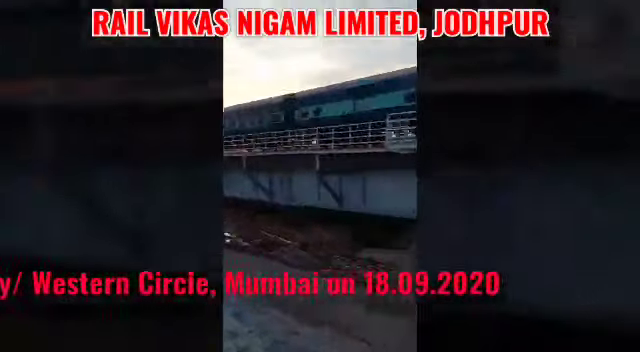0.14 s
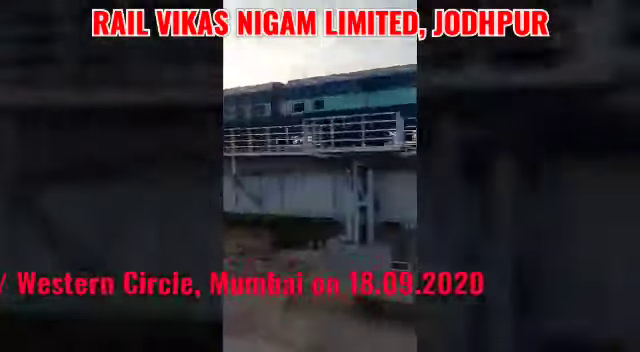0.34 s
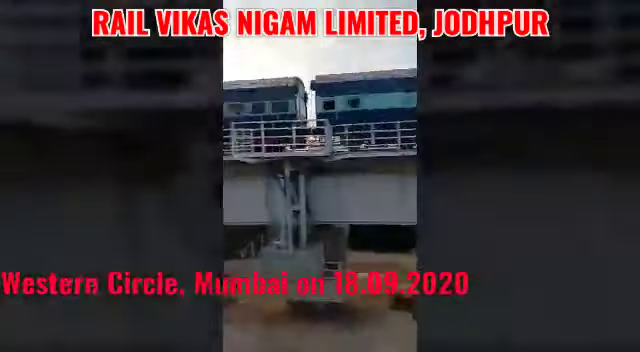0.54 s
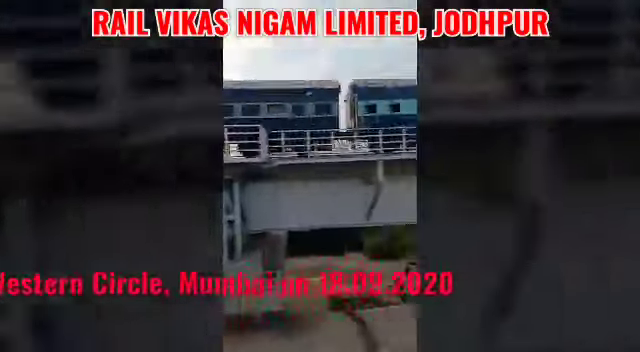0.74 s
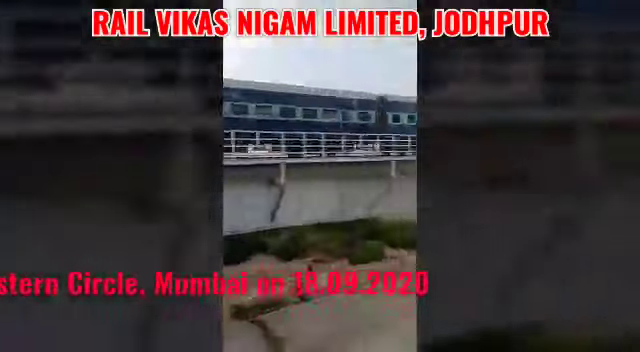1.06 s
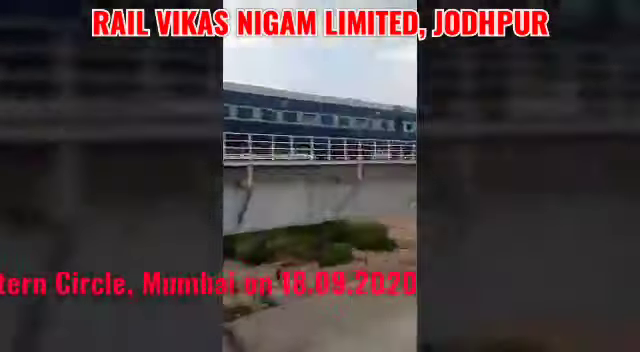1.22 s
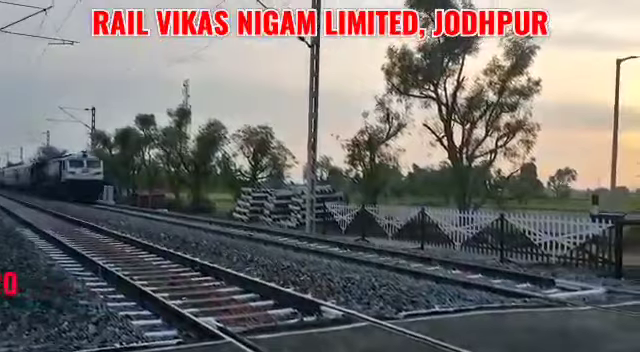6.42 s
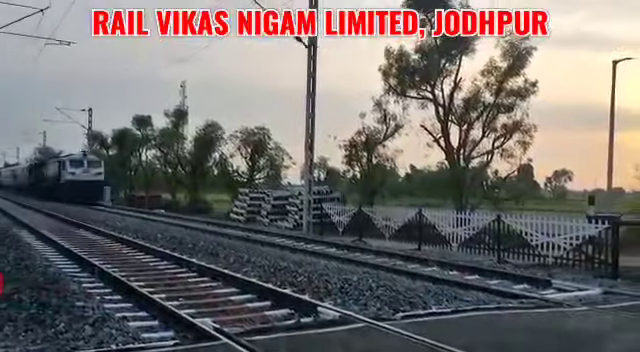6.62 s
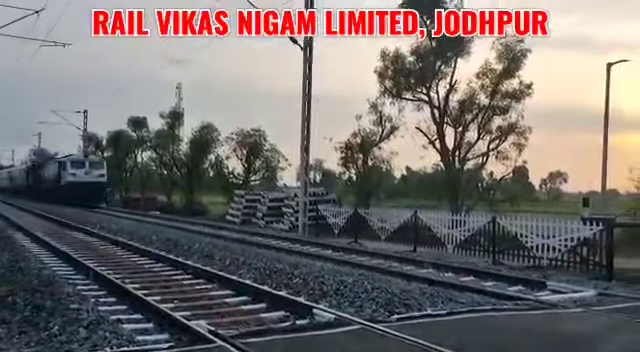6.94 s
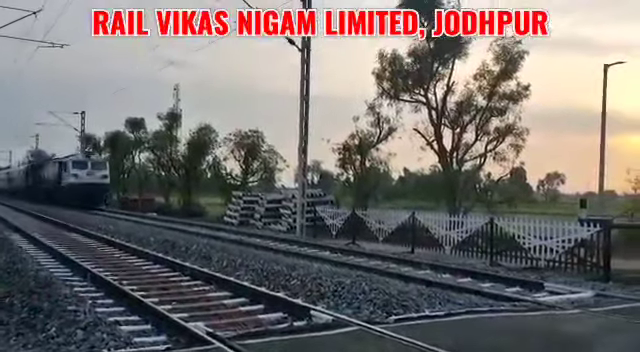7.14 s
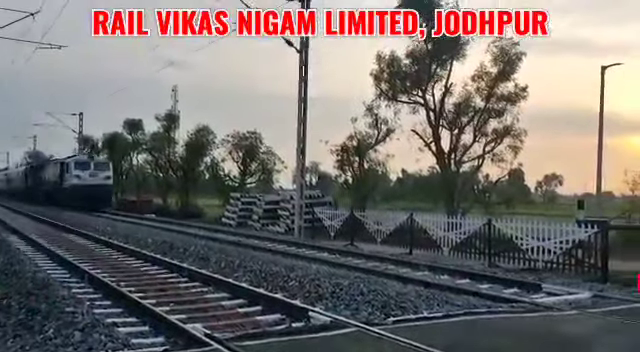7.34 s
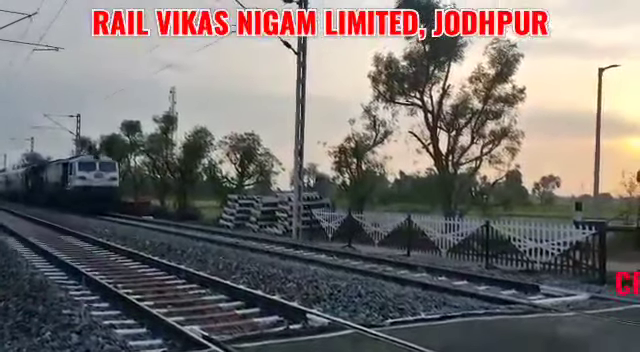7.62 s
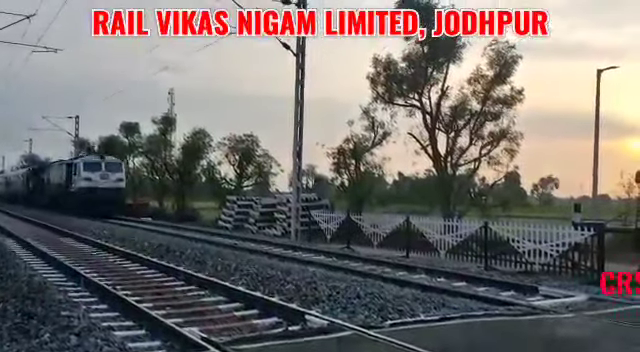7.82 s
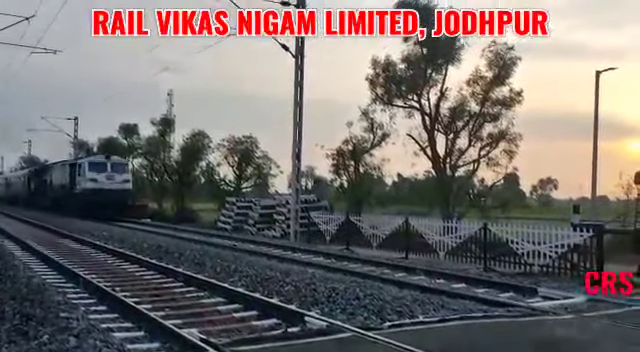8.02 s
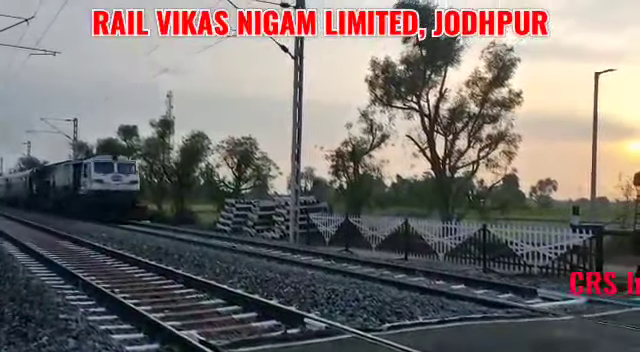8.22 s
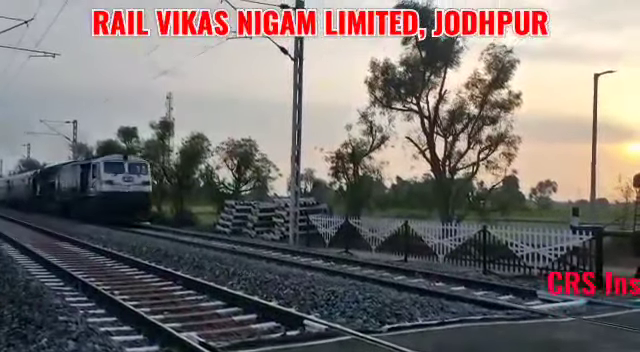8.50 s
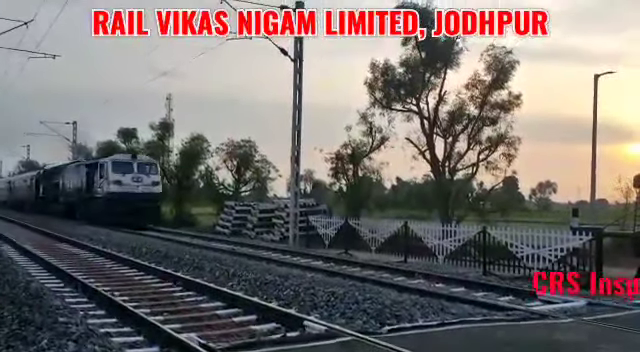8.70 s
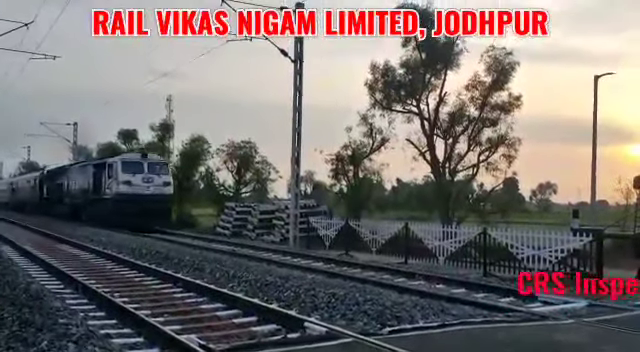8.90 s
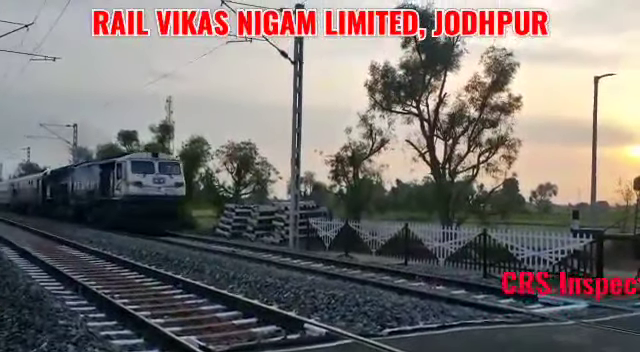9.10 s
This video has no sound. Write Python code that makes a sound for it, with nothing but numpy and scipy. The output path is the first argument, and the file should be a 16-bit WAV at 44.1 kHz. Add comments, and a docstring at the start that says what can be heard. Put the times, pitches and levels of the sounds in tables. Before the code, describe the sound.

Outdoors beside a railway, coaches roll past close by with a rough mid-range roar, ringing rails, low thuds and tiny wheel squeaks. After about three seconds they fade to silence. A throbbing diesel drone fades in, then a piercing two-note air horn bursts out and holds steadily to the end, raspy and bright, leaning left as the locomotive approaches.

```python
"""Coaches, then a diesel with its horn

Beside a railway line, coaches roll by as filtered noise with ringing tones, then fade to silence.
A diesel locomotive fades in, throbbing, and holds a two-note air horn built from overtones as it approaches.
The horn's bounce off the ground sweeps notches down through its overtones."""
import sys
import numpy as np
from scipy import signal
from scipy.fft import rfft, irfft, next_fast_len
from scipy.io import wavfile
from scipy.ndimage import uniform_filter1d, map_coordinates

SR = 44100
rng = np.random.default_rng(int(sys.argv[2]) if len(sys.argv) > 2 else 0)


def materialize(psi):
    """Save the field psi as 16-bit PCM at rate SR to the path in sys.argv[1].

    A 1-D psi becomes a single channel; in a 2-D psi each row is a channel.
    """
    bounded = np.clip(np.atleast_2d(psi).T, -1, 1)
    quanta = np.round(bounded * 32767).astype(np.int16)
    wavfile.write(sys.argv[1], SR, quanta)


N = 408807
TIME = np.arange(N) / SR
TOP_HZ = 14650  # upper limit of the whole sound

# overtones of each horn: (multiple of its pitch, far level [dB], near level [dB], left over right [dB])
HIGH_HORN = [(1, -35.5, -36, 1), (2, -18.5, -19, 4), (3, -31.5, -38.5, 3), (4, -38, -32.5, -5),
             (5, -29, -33, 4), (6, -34, -31, 1.5), (7, -30, -29, 2.5), (8, -36.5, -37, 5),
             (9, -36, -41.5, 5), (10, -35.5, -38, 8.5), (11, -40.5, -36, 13), (12, -36, -36.5, 12.5),
             (13, -37.5, -32, 15.5), (14, -36, -35, 14), (15, -37.5, -36, 9.5), (16, -40, -41, 10),
             (17, -44.5, -39, 10.5), (18, -47, -50.5, 6.5)]
LOW_HORN = [(1, -48, -41, 1), (2, -28, -28, 2), (3, -32.5, -26.5, 1.5), (4, -30, -29.5, 3.5),
            (5, -35, -33, 4), (6, -38.5, -37.5, 10), (7, -40, -43, 6), (8, -39, -35, -4),
            (9, -39.5, -35.5, 11.5), (10, -41.3, -39, 6), (11, -36, -31.5, 10), (12, -43.5, -52, 3),
            (13, -39.5, -42, 7), (14, -42, -38.5, 8.5), (15, -44.5, -49.5, 3), (16, -43.5, -41, 12),
            (17, -41, -40, 12), (18, -42, -40, 7.5), (19, -38.5, -36.5, 6.5), (20, -45, -47.5, 9),
            (21, -48, -47.5, 9.5), (22, -44, -42.5, 10.5), (23, -48, -48, 3), (24, -55, -47.5, 5.5),
            (26, -59, -54, 5)]
# pop at the horn's start: (frequency [Hz], level [dB], decay [s])
POP = [(945, -11.5, .005), (468, -26.5, .006)]
# strongest sum and difference tones: (multiple of high horn, multiple of low horn, level [dB])
SUM_TONES = [(1, 2, -45), (1, 4, -52), (6, 2, -47), (5, 5, -47), (9, -10, -44), (-1, 4, -49), (-2, 7, -49),
             (5, 2, -50)]
# treble weighting of the dense sum tones: (frequency [Hz], gain [dB])
DENSE_TONES = [(1500, -8), (3500, -2.5), (5000, -3.5)]
# colour of the rasp: (frequency [Hz], relative level [dB])
RASP = [(150, -22), (240, -24.5), (450, -23.5), (530, -26), (620, -14.5), (730, -31), (850, -11.5),
        (1150, -10.5), (1430, -14), (1700, -5), (2030, -17), (2200, -3.5), (2330, -11), (2800, -4),
        (4400, -5.5), (6000, -2), (7500, -4), (8600, -18), (10000, -21.5)]
# sideways lean of the rasp: (frequency [Hz], left over right [dB])
RASP_PAN = [(600, -24), (2000, -17), (3500, 1.5), (5000, 8.5), (7000, 7), (10000, 20)]
# the rasp grows fuller near by: (frequency [Hz], added level [dB])
RASP_NEAR = [(700, 3), (1300, 3.5), (2000, 6.5), (3000, 3.5), (4000, -.5), (5500, 0), (7000, 0)]
# colour of the horn's top octave: (frequency [Hz], relative level [dB])
SIZZLE = [(7000, -34.5), (8200, -2.5), (9500, -19), (10400, -9), (11200, -2.5), (13000, 1), (14500, -7)]
# ground bounce while far: (frequency [Hz], strength [share of direct sound])
GROUND = [(900, .03), (1300, .55), (2200, .62), (3000, .68), (5300, .6), (6500, .36), (8000, .2),
          (14000, .15)]
# the chord starts hollow and biting: (centre [Hz], width [octaves], first gain [dB], lasts [s])
START_COLOUR = [(1370, 0.28, -4, 1.6), (2350, 0.18, -1.5, 0.46), (4460, 0.084, 6, 0.7),
                (5850, 0.06, 3, 1.2)]
# noise around each overtone: (frequency [Hz], level against the overtone [dB])
NOISE_BAND = [(900, -29), (2000, -23), (3000, -20), (6000, -16)]
# lead of the left channel over the right: (frequency [Hz], phase [radians])
LEFT_LEAD = [(150, 0.48), (434, 0.38), (870, 0.69), (1300, 1.36), (2100, 1.15), (3000, 0.71), (5000, 0.099)]
# colour of the exhaust rush: (frequency [Hz], relative level [dB])
EXHAUST = [(25, -15), (60, -10), (200, -16), (420, -2), (530, -8), (620, 6), (730, -9), (830, -3.5),
           (1200, -2), (1900, -10), (2700, -12.5), (3600, -6.5), (5900, 1), (9400, -25.5), (11000, -10.5),
           (13300, -32), (14200, -61)]
# faint whistles of the locomotive's blowers: (frequency [Hz], peak level [dB])
BLOWERS = [(600, -51), (2250, -61), (3500, -48)]
# colour of the rolling noise: (frequency [Hz], relative level [dB])
ROLL = [(21, -60.5), (35, -42.5), (66, -9.5), (224, -5), (268, -4), (605, -10), (794, -6.5), (1040, -10),
        (1250, -7.5), (1500, -12.5), (2250, -14), (3400, -16.5), (4400, -23), (6200, -30), (6810, -33),
        (7800, -50), (10100, -78), (17200, -120)]
# swelling of the rolling roar; its average is trimmed by body_db: (time [s], level [dB])
ROAR = [(0, -22.3), (.4, -21), (.7, -24), (1.3, -22), (1.65, -23.5), (2.15, -22), (2.35, -23.5),
        (2.7, -22.7), (2.95, -24)]
# heavy bogies thud by: (time [s], width [s], rumble rise [dB])
SURGES = [(2.15, 0.15, 3.5), (2.93, 0.062, 4), (3.2, 0.26, 8.5)]
# ringing of wheels and bogies: (frequency [Hz], width [Hz], level before swelling [dB])
RINGS = [(853, 270, -30.5), (1170, 76, -40), (1937, 210, -39), (2660, 370, -32.5), (3134, 320, -39.5),
         (5330, 790, -40.5)]
# steady tones of the coaches: (frequency [Hz], average peak level [dB])
WHINE = [(394, -35), (558, -42), (791, -36), (1577, -47.5)]
# the rails' ring swells and strays; its level is trimmed by rail_db: (time [s], level [dB], pitch [Hz])
RAIL_RING = [(0, -24.5, 1305), (.25, -24.5, 1255), (.6, -26.5, 1280), (.85, -23.5, 1235),
             (1.05, -22.5, 1262), (1.4, -21.5, 1245), (1.7, -23, 1265), (1.9, -27, 1258), (2.45, -23, 1265),
             (2.95, -27, 1262)]
# wheel flanges sing: (time [s], frequency [Hz], level [dB])
SQUEAKS = [(.34, 2670, -28.5), (.735, 2605, -20.5), (.86, 2530, -27), (1.41, 2600, -31)]

# times and lengths in seconds
FADE_OUT_S, FADE_OUT_LENGTH_S, FADE_OUT_POWER = 2.967, 0.57, 1.1  # the coaches fade to silence
FADE_IN_S, FADE_IN_LENGTH_S, FADE_IN_POWER = 3.681, 0.21, 1.37  # the locomotive fades in
HORN_S = 4.151  # the valve opens
LOW_SPEAKS_S, LOW_JOINS_S, JOIN_LENGTH_S = 4.175, 4.225, .055  # the low horn speaks, then opens further
CATCH_S, CATCH_LENGTH_S, CATCH_DB = 4.278, .022, 2.5  # the rasp flares as the low horn catches
NEAR_S, NEAR_LENGTH_S = 7.01, 1.0  # the horn passes from far to near
# the engine tone and the horns' fundamentals thin out at the end
THIN_S, THIN_LENGTH_S, THIN_DB = 8.56, .5, -6

HIGH_HZ, LOW_HZ = 433.75, 307.1  # pitches before the slow Doppler rise
DOPPLER_PER_S = .00078  # both pitches creep up by this share a second as the train gathers speed
HIGH_SHARP, HIGH_SETTLE_S, LOW_SHARP = .053, .029, .046  # each horn starts sharp by this share of its pitch
# notch spacing [Hz per second left until arrival], arrival [s], phase shift at the ground [cycles]
BOUNCE_RATE, ARRIVAL_S, GROUND_TURN = 232, 12.3, .19
BOUNCE_FADES_S, BOUNCE_FADE_LENGTH_S = 6.6, 1.1
BOUNCE_LOSS = .74  # share of the bounce's strength lost near by
SHIMMER_DB, TWINKLE_DB = .65, .55  # slow and quick drift in the moving air, at 2500 Hz


def horns(high_db=0, low_db=0, rasp_db=-29.0, sizzle_db=-40.5, sizzle_near_db=4.0, solo_rasp=0.64):
    """Two horns a tritone apart: a pop marks the start, the high one sounds and the low one joins; both settle
    from sharp."""
    blown = ramp(HORN_S, 0.0087)
    bright = ramp(HORN_S + 0.0026, 0.0067)
    joined = ramp(LOW_JOINS_S, JOIN_LENGTH_S)
    settling = np.exp(-np.maximum(TIME - HORN_S, 0) / HIGH_SETTLE_S)
    high_phase = diaphragm(HIGH_HZ * (1 + HIGH_SHARP * settling))
    low_phase = diaphragm(LOW_HZ * (1 + LOW_SHARP * (1 - joined)))

    high = amp(high_db) * blown * horn(high_phase, HIGH_HORN, bright)
    low_opening = 0.2 + 0.74 * joined
    low = amp(low_db) * ramp(LOW_SPEAKS_S, 0.034) * horn(low_phase, LOW_HORN, low_opening, bass_sway_db=1.8)
    rasp_level = amp(rasp_db + CATCH_DB * swell(CATCH_S, CATCH_LENGTH_S))
    rasp_level = rasp_level * (solo_rasp * bright + (1 - solo_rasp) * joined)
    edge = rasp_level * approaching(rasp(high_phase, low_phase))
    sheen = bright * amp(sizzle_db + sizzle_near_db * nearness()) * sizzle(high_phase, low_phase)
    sums = joined * sum(amp(db) * sine(j * high_phase + k * low_phase) for j, k, db in SUM_TONES)

    chord = open_air(high + low + sums + edge + sheen)
    return chord + noise_around(chord) + blown * pop()


def diaphragm(pitch_hz, waver=0.00027):
    """Phase of a horn's diaphragm as heard: it wavers a little, and the Doppler shift slowly grows."""
    doppler = 1 + DOPPLER_PER_S * (TIME - HORN_S)
    return 2 * np.pi * np.cumsum(pitch_hz * doppler * (1 + waver * wobble(25))) / SR


def horn(phase, overtones, opening, flutter_db=0.5, narrowing=0.2, bass_sway_db=1.2):
    """Upper overtones swell as the valve opens; their mix shifts nearer by, and the fundamental sways."""
    near = nearness()
    flutter = amp(flutter_db * wobble(7))
    fundamental = amp(THIN_DB * ramp(THIN_S, THIN_LENGTH_S) + bass_sway_db * wobble(6))
    tone = np.zeros((2, N))
    for multiple, far_db, near_db, pan_db in overtones:
        shape = {1: fundamental, 2: 1}.get(multiple, opening)
        level = amp(far_db * (1 - near) + near_db * near)
        lean_db = pan_db * (1 + narrowing * (.5 - near))
        tone += level * shape * overtone(phase, multiple, lean_db)
    return tone * flutter


def overtone(phase, multiple, pan_db, scatter=1.17):
    """One stereo partial; roughly aligned partials (scatter in radians) add up to a sharp spike each cycle."""
    wave = -np.sqrt(2) * np.cos(multiple * phase + scatter * rng.standard_normal())
    return amp(split(pan_db)) * wave


def pop():
    """A short pop of two quickly dying tones marks the start of the horn."""
    since = np.maximum(TIME - HORN_S - .007, 0)
    return sum(amp(db) * np.exp(-since / decay) * sine(2 * np.pi * hz * TIME) for hz, db, decay in POP)


def rasp(high_phase, low_phase, air_db=-9, pulsing=0.3):
    """The loud waves mix into dense sum and difference tones in the treble, over the hiss of escaping air."""
    def mix(u, v, w):
        bend = 3 * np.sin(2 * high_phase - 3 * low_phase + w)
        return np.sin(9 * np.sin(high_phase + u) + 11 * np.sin(low_phase + v) + bend)

    mixed = unit(np.array([mix(*start) for start in rng.uniform(0, 2 * np.pi, (2, 3))]))
    mixed = filtered(mixed, lambda hz: amp(along(DENSE_TONES, hz)))
    air = amp(air_db) * rng.standard_normal((2, N))
    mid, side = (mixed + air) * (1 + pulsing * np.cos(high_phase))
    return unit(filtered(mid + split(side), lambda hz: amp(along(RASP, hz) + split(along(RASP_PAN, hz)))))


def approaching(x):
    """The rasp turns from its far colour to its near one."""
    near_sound = filtered(x, lambda hz: amp(along(RASP_NEAR, hz)))
    return x * (1 - nearness()) + near_sound * nearness()


def sizzle(high_phase, low_phase, coupling=0.012, fizz_db=0.5, flutter_db=1.5, width=0.097):
    """Steep wave fronts of the high horn, jostled by the low one, carry the top octave."""
    front = high_phase + coupling * np.sin(2 * low_phase)
    lines = sum(np.sin(k * front + rng.uniform(0, 2 * np.pi)) for k in range(19, 35))
    lines = unit(filtered(lines, lambda hz: amp(along(SIZZLE, hz))))

    def fizz():
        return noise(lambda hz: amp(along(SIZZLE, hz)) * (hz > 10600) * (hz < TOP_HZ))

    stereo = lines + amp(fizz_db) * fizz() + split(2 * width * fizz())
    return unit(stereo) * amp(flutter_db * wobble(18))


def open_air(x):
    """The ground bounce lags more and weakens as the distance shrinks; turbulence makes overtones drift."""
    hz, t, z = signal.stft(x, SR, nperseg=1024)
    lag = 1 / (BOUNCE_RATE * (ARRIVAL_S - t))
    fading = np.interp(t, TIME, ramp(BOUNCE_FADES_S, BOUNCE_FADE_LENGTH_S))
    strength = np.outer(along(GROUND, hz), 1 - BOUNCE_LOSS * fading)
    cycles = hz[:, None] * lag - GROUND_TURN
    notches = np.abs(1 - strength * np.exp(-2j * np.pi * cycles))  # the minus sign turns the bounce over
    slow, fast = patches(z.shape[1:], 7, 30), patches(z.shape[1:], 9, 4)
    more_in_treble = np.clip(hz / 2500, 0, 1.5)[:, None]
    drift = amp((SHIMMER_DB * slow + TWINKLE_DB * fast) * more_in_treble)
    return signal.istft(z * notches * start_colour(hz, t) * drift, SR, nperseg=1024)[1][:, :N]


def start_colour(hz, t):
    """A few bands start muted or biting and settle as the blast goes on."""
    total_db = 0
    for centre, octaves, db, lasts in START_COLOUR:
        band = np.exp(-(np.log2((hz + 1) / centre) / octaves) ** 2)
        remaining = 1 - np.clip((t - HORN_S) / lasts, 0, 1) ** 2
        total_db = total_db + db * np.outer(band, remaining)
    return amp(total_db)


def noise_around(x):
    """A narrow band of noise surrounds each overtone, stronger in the treble."""
    hz, t, z = signal.stft(x, SR, nperseg=1024)
    chance = rng.standard_normal(z.shape[1:]) + 1j * rng.standard_normal(z.shape[1:])
    return signal.istft(z * chance * amp(along(NOISE_BAND, hz))[:, None], SR, nperseg=1024)[1][:, :N]


def nearness():
    """0 while the locomotive is far, 1 once it is near."""
    return ramp(NEAR_S, NEAR_LENGTH_S)


def diesel(firing_hz=105.6, throb_hz=14.0, throb=0.44, tone_db=0.0, churn_db=-9, sway_db=1.0,
           alone_db=-29.0, under_horn_db=-54.5, growth_db_per_s=3,
           rush_db=-35.0, rush_drop_db=-7.0, rush_db_per_s=2.0, drop_s=4.13, drop_length=0.022):
    """Exhaust drones at the firing rate, throbs once per crank turn, drops as the horn starts, then grows."""
    covered = ramp(drop_s, drop_length)
    since_drop = TIME - drop_s
    growing_db = under_horn_db + growth_db_per_s * since_drop
    growing_db = growing_db + THIN_DB * ramp(THIN_S, THIN_LENGTH_S) + sway_db * wobble(2.62)
    level = amp(alone_db * (1 - covered) + growing_db * covered)

    beat = 1 + throb * np.sin(2 * np.pi * throb_hz * TIME + wobble(2.5))
    drone = amp(tone_db) * unit(beat * np.sin(2 * np.pi * firing_hz * TIME + 0.29 * wobble(12)))
    churn_colour = [(25, -22), (60, -6), (95, 1), (150, -9.0), (300, -17), (700, -53)]  # Hz, relative dB
    churn = amp(churn_db) * noise(lambda hz: amp(along(churn_colour, hz)))
    rush_level = amp(rush_db + covered * (rush_drop_db + rush_db_per_s * since_drop))
    rush = rush_level * noise(lambda hz: amp(along(EXHAUST, hz)))
    whistle = sum(amp(db) * np.sin(2 * np.pi * hz * TIME + 1.3 * wobble(80)) for hz, db in BLOWERS)
    fade = ramp(FADE_IN_S, FADE_IN_LENGTH_S) ** FADE_IN_POWER
    return (level * (drone + churn) + rush + whistle * (1 - covered)) * fade


def coaches(rumble_db=-33, body_db=1.55, hiss_db=-22.6, hiss_db_per_s=-1.0,
            rattle_db=0.43, sway_db=0.16):
    """Rough wheels shake track and bogies, whose resonances ring; bogies rattle and the hiss slowly dulls."""
    def band(lo, hi):
        return noise(lambda hz: amp(along(ROLL, hz)) * (hz > lo) * (hz < hi))

    rattle = amp(rattle_db * wobble(28.2) + 0.62 * wobble(90))
    roar_db, = curves(ROAR)
    usual_db = np.mean(np.transpose(ROAR)[1])
    body_swell = amp(roar_db - usual_db + sway_db * wobble(5.78))
    body = amp(usual_db + body_db) * body_swell * band(170, 1150)
    hiss = amp(hiss_db + hiss_db_per_s * TIME) * band(1150, 7700)
    rings = sum(amp(db) * wandering(ringing(centre, width), share=.006) for centre, width, db in RINGS)
    roar = body + hiss + track() + rings * body_swell

    surge = amp(sum(db * swell(s, length) for s, length, db in SURGES))
    rumble = amp(rumble_db) * surge * band(10, 170)
    whine = 0
    for hz, db in WHINE:
        whine = whine + amp(db + 2 * wobble(3.9)) * np.sin(2 * np.pi * hz * TIME + 0.7 * wobble(9))
    fade = (1 - ramp(FADE_OUT_S, FADE_OUT_LENGTH_S)) ** FADE_OUT_POWER
    return (rattle * patchy(roar, depth_db=0.76) + rumble + whine) * fade


def track(rail_hz=1260, rail_width_hz=72, rail_db=-2.3,
          sleeper_hz=277, sleeper_width_hz=52, sleeper_db=-28.5):
    """The rails ring at a straying pitch and the sleepers boom as the wheels load them."""
    level_db, pitch_hz = curves(RAIL_RING)
    # reading the ring faster or slower bends its pitch
    rails = np.interp(np.cumsum(pitch_hz / rail_hz) / SR, TIME, ringing(rail_hz, rail_width_hz))
    sleepers = wandering(ringing(sleeper_hz, sleeper_width_hz), share=.006)
    return amp(level_db + rail_db) * rails + amp(sleeper_db) * sleepers


def squeaks(length=0.015):
    """A flange touches the rail and sings for a moment: short sine swells with a jittery phase."""
    return sum(amp(db) * swell(s, length) * sine(2 * np.pi * hz * TIME + 1.3 * wobble(100))
               for s, hz, db in SQUEAKS)


def ringing(centre, width):
    """A resonance shaken by noise, rms 1."""
    return noise(lambda hz: (hz * width / (centre ** 2 - hz ** 2 + 1j * hz * width)) ** 2)


def wandering(x, share):
    """The pitch of a sound strays slowly, typically by this share."""
    return np.interp(TIME + np.cumsum(share * wobble(6)) / SR, TIME, x)


def patchy(x, depth_db):
    """Each band swells and sinks on its own."""
    z = signal.stft(x, nperseg=512)[2]
    return signal.istft(z * amp(depth_db * patches(z.shape, 4, 24)), nperseg=512)[1][:N]


def patches(shape, bins, frames):
    """A random field of rms 1, smooth over frequency and time."""
    field = uniform_filter1d(rng.standard_normal(shape), size=bins, axis=0)
    return unit(uniform_filter1d(field, size=frames, axis=1))


def noise(response):
    """Coloured noise of rms 1."""
    return unit(filtered(rng.standard_normal(N), response))


def filtered(x, response):
    """x shaped by a gain that depends on frequency."""
    m = next_fast_len(N + 8192)
    return irfft(rfft(x, m) * response(np.fft.rfftfreq(m, 1 / SR)), m)[..., :N]


def low_pass(x, edge_hz):
    """Steep but rounded roll-off above the edge."""
    return filtered(x, lambda hz: 1 / (1 + (hz / edge_hz) ** 120))


def sine(phase):
    """A sine wave of rms 1."""
    return np.sqrt(2) * np.sin(phase)


def split(x):
    """Half of x for the left channel, minus half for the right."""
    return np.outer([.5, -.5], x)


def amp(db):
    """Decibels to gain."""
    return 10 ** (np.asarray(db) / 20)


def unit(x):
    """Scale to rms 1."""
    return x / np.sqrt(np.mean(x ** 2) + 1e-20)


def along(points, hz):
    """Read values between (frequency, value) points on a log axis."""
    f, v = np.transpose(points)
    return np.interp(np.log(hz + 1), np.log(f + 1), v)


def curves(rows):
    """One value per sample for each column after the time."""
    s, *cols = np.transpose(rows)
    return [np.interp(TIME, s, c) for c in cols]


def ramp(start, length):
    """Rises from 0 to 1, then stays."""
    return np.clip((TIME - start) / length, 0, 1)


def swell(s, width):
    """A bell-shaped rise to 1 and fall."""
    return np.exp(-((TIME - s) / width) ** 2)


def wobble(rate):
    """A smooth random curve through this many random points a second."""
    return map_coordinates(rng.standard_normal(int(N * rate / SR) + 4), [TIME * rate])


def scene():
    """Coaches and engine sit in the middle; the horn leads on the left, where most overtones are louder."""
    blast = filtered(horns(), lambda hz: np.exp(1j * split(along(LEFT_LEAD, hz))))
    passing = low_pass(coaches() + squeaks(), edge_hz=7820)
    return blast + diesel() + passing


def record(dry):
    """The highest peaks are rounded off, and the sound rolls off steeply above the upper limit."""
    rounded = dry / (1 + np.abs(dry / .98) ** 10) ** .1
    return low_pass(rounded, TOP_HZ)


dry = scene()
out = record(dry)
materialize(out)
```